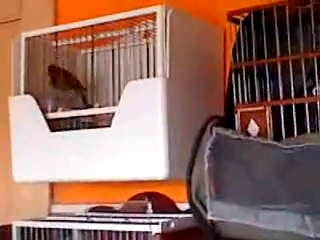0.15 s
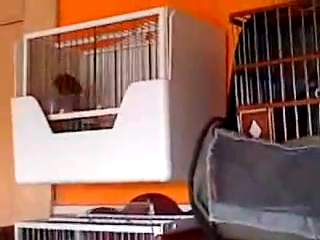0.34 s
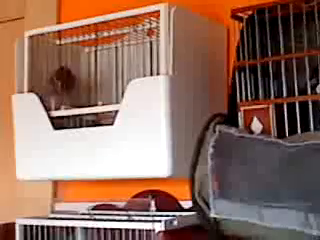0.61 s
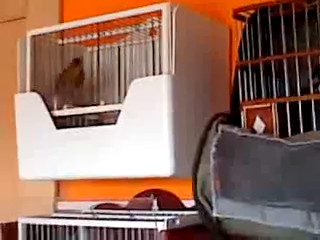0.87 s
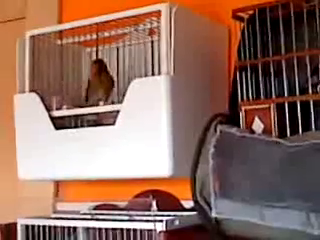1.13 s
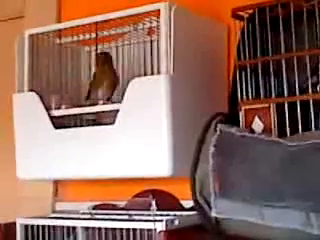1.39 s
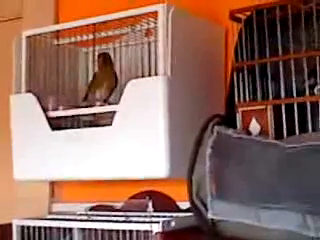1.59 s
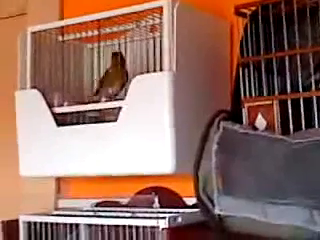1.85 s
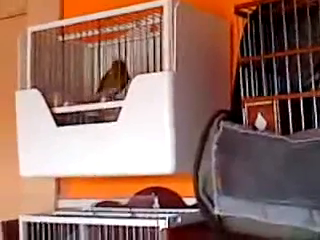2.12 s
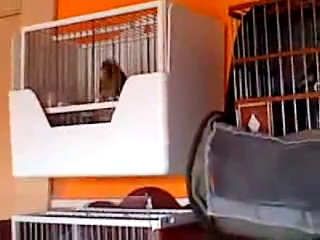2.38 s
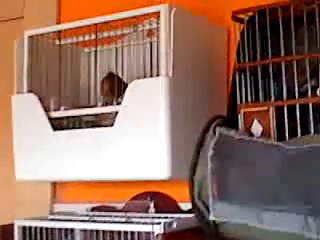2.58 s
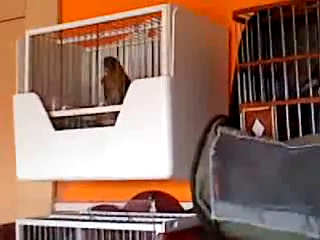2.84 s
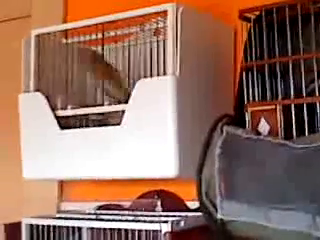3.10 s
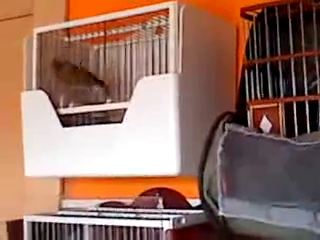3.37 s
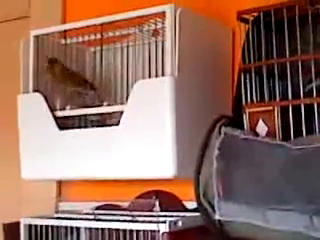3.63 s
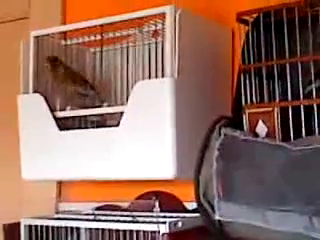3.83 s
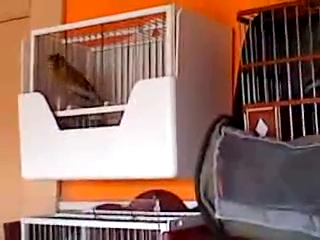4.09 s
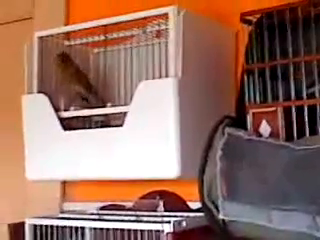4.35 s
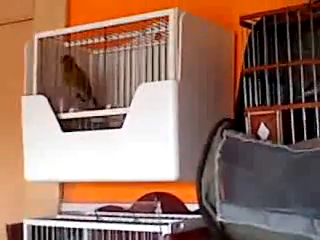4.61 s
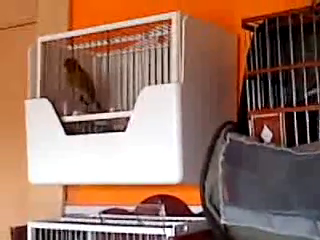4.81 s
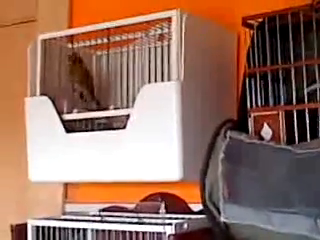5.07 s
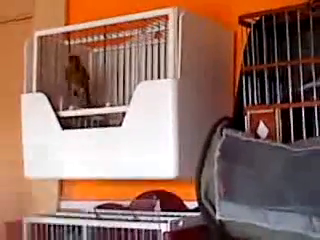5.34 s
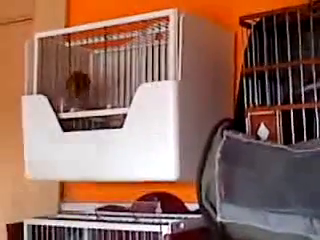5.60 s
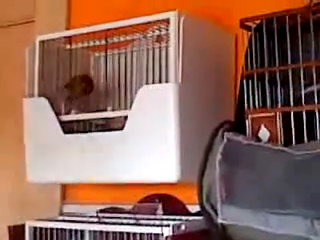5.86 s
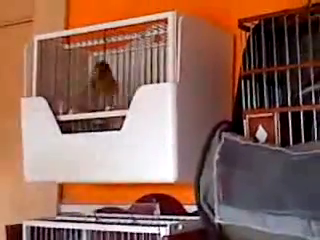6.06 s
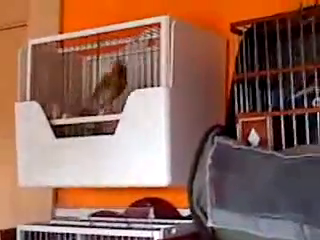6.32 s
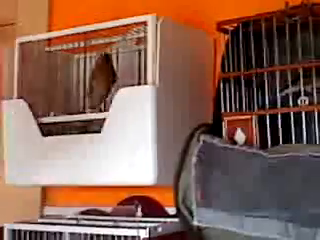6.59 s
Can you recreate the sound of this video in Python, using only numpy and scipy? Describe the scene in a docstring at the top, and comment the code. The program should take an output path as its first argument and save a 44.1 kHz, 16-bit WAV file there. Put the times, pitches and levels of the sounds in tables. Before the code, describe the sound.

Close, rapid finch song of whistled phrases rings in a hard-walled room, followed by fainter whistles and scratchy chirps from other birds and soft cage knocks.

```python
"""A small finch sings close by in its cage: fast trills of pure whistles, gliding sines that swell and fade,
and two buzzy falling slurs whose pitch and strength shake. Dense echoes of a hard-walled room smear it all.
Further off, other birds whistle and chirp harshly on two scattered voices; the cage knocks softly, ringing
in a few modes. Behind lie street noise shaped in bands, a far engine's wavering drone and a faint mains hum."""
import sys
import numpy as np
from scipy import signal
from scipy.io import wavfile
from scipy.ndimage import uniform_filter1d, map_coordinates

SR = 44100
rng = np.random.default_rng(int(sys.argv[2]) if len(sys.argv) > 2 else 0)


def gain_from_decibels(decibels):
    """Convert decibel values to linear amplitude factors."""
    exponent = np.asarray(decibels, float) / 20
    return 10 ** exponent


def wav_out(sig):
    """Save sig, one row per channel (or a flat mono array), as 16-bit PCM at SR to the path in sys.argv[1]."""
    wavfile.write(sys.argv[1], SR, np.round(np.clip(np.atleast_2d(sig).T, -1, 1) * 32767).astype(np.int16))


N = 295470  # samples, 6.7 s


def add(mix, s, sound):
    """Mixes a sound in at time s; the mix starts one second early."""
    part = mix[round((s + 1) * SR):][:len(sound)]
    part += sound[:len(part)]


def wander(length, hz):
    """Smooth random curve of rms near 1 that turns about hz times a second."""
    knots = rng.standard_normal(int(length * hz / SR) + 6)
    return map_coordinates(knots, [np.arange(length) * hz / SR + 1], order=3)


def tone(hz, db):
    """A sine on a pitch curve with soft ends; db is its rms level between them."""
    wave = np.sin(2 * np.pi * np.cumsum(hz) / SR)
    return np.sqrt(2) * gain_from_decibels(db) * wave * signal.windows.tukey(len(hz), .15)


def whistles(mix, strokes, repeats):
    """Strokes glide to a held note, swell and fade; fast slight wavers of pitch and level make them grainy."""
    ease = 1.44  # the glide slows as it lands
    fade_db_per_s = 303
    stray = 0.0031  # share by which the pitch of each stroke strays
    overtone_db = -40.5  # the faint second harmonic, under the whistle
    for start, effort_db in repeats:
        for delay, from_hz, to_hz, glide, hold, db, swell_db in strokes:
            t = np.arange(0, glide + hold, 1 / SR)
            left = np.clip(1 - t / glide, 0, 1)  # share of the glide still to come
            hz = to_hz + (from_hz - to_hz) * left ** ease
            hz = hz * (1 + stray * rng.standard_normal())
            hz = hz * (1 + .005 * wander(len(t), 280))
            fade_db = fade_db_per_s * np.maximum(t - glide, 0)
            level_db = effort_db + db - swell_db * left - fade_db
            level_db = level_db + 2.5 * wander(len(t), 130)
            add(mix, start + delay, tone(hz, level_db) + tone(2 * hz, level_db + overtone_db))


def slur(length, top_hz, bottom_hz, peak_db):
    """A falling whistle whose pitch and strength shake fast and unevenly, heard as a buzz."""
    buzz_hz, swing_hz = 157.2, 394  # mean rate of the shake, and how far the pitch swings each way
    peak_at, swell_db, fade_db = 0.73, 15, 12  # loudest at this share of the fall
    u = np.arange(0, length, 1 / SR) / length
    hz = top_hz * (bottom_hz / top_hz) ** u  # equal octaves in equal times
    db = peak_db - np.interp(u, [0, peak_at, 1], [swell_db, 0, fade_db])
    shake = 2 * np.pi * np.cumsum(buzz_hz * (1 + 0.27 * wander(len(u), 86))) / SR
    level_db = db + 6 * np.cos(shake + .3) + 2.5 * wander(len(u), 150)
    return tone(hz + swing_hz * np.sin(shake), level_db)


def finch():
    """The close singer, without the room: phrases of whistled strokes, and two slurs."""
    # song phrases by name; levels are ahead of the room and the mix
    # strokes: delay/s, from f/Hz, to f/Hz, glide/s, hold/s, level/dB, swell/dB (a flick has no hold)
    # repeats: t/s, effort/dB
    phrases = { "four steps": ([(.005, 3225, 3840, .018, 0.01, -17, 28),
               (.097, 2840, 3320, 0.025, 0.0052, -41, 1), (.129, 4010, 4416, 0.013, .02, -21, 0),
               (.181, 6050, 5610, 0.026, 0.0083, -32.5, 0.5), (.202, 5420, 5310, 0.056, .015, -30, -1)],
               [(-.36, 4), (-.088, 1), (.182, -0.5), (.453, 0)]),
               "two rises": ([(.002, 3070, 3946, .015, .013, -19, 12),
               (.052, 4100, 4640, .007, 0.0028, -25, -0.5), (.059, 4850, 5010, 0.0089, .024, -24.5, 5.5)],
               [(.748, -0.5), (.868, 1), (.988, 2), (1.108, 0.5), (1.229, 0), (1.352, 1), (1.477, 0)]),
               "slow hook": ([(.002, 3000, 3460, 0.026, 0.0091, -35.5, -2),
               (.046, 3800, 4780, .02, .008, -25.5, 6)], [(1.596, 2)]),
               "hook and hold": ([(.002, 3730, 3216, 0.016, 0.0066, -39.5, -14.5),
               (.016, 3300, 4257, 0.016, 0, -26.5, 8.5), (.029, 4280, 4422, .016, .004, -24.5, 2),
               (.044, 6300, 7300, .011, 0, -42.5, -10.5), (.056, 5740, 5638, 0.005, 0.021, -22.5, 9)],
               [(1.701, -0.5), (1.797, 1), (1.892, 1), (1.987, 0), (2.085, 1), (2.183, 0), (2.281, -1)]),
               "chup and cry": ([(-.016, 2450, 2700, 0.013, 0, -43.5, 5.5),
               (.002, 2950, 3363, 0.011, .012, -20, 11.5), (.034, 4485, 5554, .01, 0.0036, -28, 6),
               (.047, 5570, 5050, .008, 0.0016, -30, 0), (.047, 3700, 4250, .011, 0.007, -31, 3),
               (.059, 4300, 4530, 0.01392, .016, -15.5, 7)], [(2.724, -2), (2.856, 0), (2.987, 0),
               (3.119, -0.5), (3.251, -3)]), "rise and arch": ([(.003, 2400, 3065, .013, 0.00065, -41.5, 5),
               (.015, 3050, 3466, 0.0179, .006, -22.5, 3.5), (.061, 7240, 8710, .01, 0, -46, 4.5),
               (.071, 8950, 6350, 0.022, 0.0032, -36, 9.5), (.099, 6260, 6002, .018, .008, -27.5, 5)],
               [(3.638, -2.5), (3.784, -1), (3.928, -1.5), (4.069, -0.5), (4.215, 0), (4.357, 1),
               (4.508, -0.5)]), "closing pair": ([(.002, 3010, 3388, .018, 0.008, -25, 9),
               (.032, 5780, 5100, 0.0102, 0.0075, -32.5, 3), (.043, 5066, 4890, .028, 0.0023, -26.5, -1)],
               [(4.66, 0), (4.752, 1), (4.846, 1)]), }
    # buzzy falling slurs: t/s, length/s, top f/Hz, bottom f/Hz, level/dB ahead of shake, room and mix
    slurs = [(2.416, 0.25, 8460, 3404, -30), (3.41, .22, 8500, 3540, -28.5)]
    song = np.zeros(N + SR)
    for strokes, repeats in phrases.values():
        whistles(song, strokes, repeats)
    for s, *shape in slurs:
        add(song, s, slur(*shape))
    return song


def chirp(db, upper_hz):
    """Two voices droop while their pitch scatters too fast to be heard as a tone."""
    droop = np.linspace(1.07, .93, round(0.0369 * SR))
    fade_db = np.linspace(4, -12, len(droop))
    out = np.zeros(len(droop))
    for voice_hz in (upper_hz, .7 * upper_hz):
        pitch = voice_hz * droop * (1 + .11 * wander(len(droop), 700))
        out += tone(pitch, db + fade_db + 3 * wander(len(droop), 94))
    return out


def far_birds():
    """Birds further off, without the room: low whistles, a thin note among them, and harsh chirps."""
    # four low whistles, and among them one thin note on two pitches at once; levels ahead of room and mix
    # strokes: delay/s, from f/Hz, to f/Hz, glide/s, hold/s, level/dB, swell/dB; repeats: t/s, effort/dB
    far_whistle = ([(.004, 2002, 2398, 0.0197, 0.0056, -47.5, 2.2)], [(5.437, -3), (5.706, 0.5),
                    (5.916, -4.5), (6.378, -1)])
    thin_note = ([(0, 5930, 5630, 0.017, 0.018, -51.5, 5.5), (0, 7000, 6850, 0.0059, .008, -53, 6)],
                  [(5.64, 0)])
    # harsh two-voiced chirps: t/s, level/dB ahead of fade, room and mix, upper voice f/Hz
    chirps = [(4.433, -51, 5400), (4.529, -50, 5280), (4.631, -51, 5350), (4.725, -51, 5900),
              (4.973, -52.5, 5730), (5.058, -52.5, 5810), (5.168, -54.5, 5660), (5.283, -58.5, 5730),
              (5.415, -67, 5200), (6.03, -56, 5140), (6.134, -50, 5140), (6.21, -56.5, 4450),
              (6.245, -54, 5030), (6.377, -53, 5050), (6.488, -53.5, 5280), (6.597, -52.5, 5270)]
    calls = np.zeros(N + SR)
    whistles(calls, *far_whistle)
    whistles(calls, *thin_note)
    for s, *voice in chirps:
        add(calls, s, chirp(*voice))
    return calls


def knocks():
    """Each knock rings the modes of the cage, with a dull puff of noise."""
    # soft knocks on the cage: t/s, peak level of the ring/dB
    knock_times = [(6.216, -28.5), (6.229, -26), (6.25, -28.5)]
    # modes of the cage: f/Hz, relative level/dB, time to fall 60 dB/s
    cage = [(206, -19, 0.074), (335, 4.5, 0.23), (670, -2, 0.094), (955, 7, 0.054), (1393, -1, 0.097),
            (1840, -10, 0.035)]
    t, out = np.arange(SR // 4) / SR, np.zeros(N + SR)
    ring = sum(gain_from_decibels(db - 60 * t / t60) * np.sin(2 * np.pi * hz * t) for hz, db, t60 in cage)
    for s, db in knock_times:
        puff = gain_from_decibels(-14.5 - 60 * t / 0.21) * wander(len(t), 4000)
        add(out, s, gain_from_decibels(db) * (ring / abs(ring).max() + puff))
    return out


def room(x, direct_db, count=3):
    """Dense echoes: several random tails that blend into one another steadily, added to the direct sound."""
    hz, t, z = signal.stft(rng.standard_normal((count, SR // 2)), SR, nperseg=128)
    # air and cloth take the treble first
    t60 = 0.34 / (1 + (hz[:, None] / 14000) ** 2)
    # nearly even for about 68 ms, then a quick drop to a weaker tail
    late = 1 / (1 + np.exp(-(t - .068) / .005))
    fade_db = -60 * t / t60 - 7 * late
    tails = signal.istft(z * gain_from_decibels(fade_db), SR, nperseg=128)[1]
    # no echo in the first 2 ms
    tails = tails * np.clip((np.arange(tails.shape[1]) / SR - .002) / 0.00087, 0, 1)
    phase = np.arange(len(x)) / SR * 2.5  # in half cycles
    out = gain_from_decibels(direct_db) * x
    for k, tail in enumerate(tails):
        weight = np.sqrt(2 / count) * np.cos(np.pi * (phase + k / count))  # squares sum to 1
        out = out + signal.oaconvolve(x * weight, tail / np.linalg.norm(tail))[:len(x)]
    return out


def read(points, hz):
    """Spectrum points joined on a log-frequency axis."""
    f, value = np.transpose(points)
    return np.interp(np.log(hz + 1), np.log(f + 1), value)


def evened(x):
    """Scales to rms 1."""
    return x / np.sqrt(np.mean(x ** 2) + 1e-20)


def street():
    """Street noise: random short-time spectra with faint drifting patches, at -42 dB rms."""
    # spectrum of the street at the microphone: f/Hz, relative density/dB per Hz
    street_spectrum = [(12, -43), (20, -7.5), (68, 2), (190, -4.5), (320, -3.5), (600, -5), (721, -1),
                       (780, -5.5), (866, -3), (1150, -4), (1900, -16.5), (2400, -16), (3200, -18.5),
                       (8890, -22.5), (10400, -25), (13500, -81), (22000, -120)]
    frames, hz = N // 256 + 5, np.fft.rfftfreq(1024, 1 / SR)
    a, b, patches = rng.standard_normal((frames, 513, 3)).T
    patches = uniform_filter1d(patches, 10, 0)  # along frequency
    patches = evened(uniform_filter1d(patches, 16, 1))  # along time
    z = (a + 1j * b) * gain_from_decibels(read(street_spectrum, hz)[:, None] + 1.19 * patches)
    noise = signal.istft(z, nperseg=1024, noverlap=768)[1][:N]
    return gain_from_decibels(-42) * evened(noise)


def drone():
    """A far engine: one low sine that wavers slightly in pitch and level."""
    # course of the drone: t/s, f/Hz, level/dB ahead of the waver
    drone_course = [(0.161, 69.26, -58), (0.241, 68.1, -42), (1.0, 69, -46), (1.68, 68.9, -52.5),
                    (1.78, 68.8, -47), (2.001, 65.06, -45.5), (2.399, 63.83, -48.5), (2.851, 64.5, -61.5),
                    (3.3, 58.4, -54), (3.9, 60, -50.5), (4.5, 60.7, -61), (5.2, 58, -60), (6.3, 58, -50),
                    (6.7, 57.3, -58)]
    s, hz, db = np.transpose(drone_course)
    t = np.arange(N) / SR
    level = gain_from_decibels(np.interp(t, s, db) + 0.49 * wander(N, 1.7))
    pitch = np.interp(t, s, hz) + 0.43 * wander(N, 1.4)
    return np.sqrt(2) * level * np.sin(2 * np.pi * np.cumsum(pitch) / SR)


def hum():
    """Mains hum of an appliance: faint lines of steady pitch whose levels flutter."""
    # hum lines: f/Hz, level/dB ahead of the flutter
    hum_lines = [(99.5, -60.5), (199, -63)]
    t, out = np.arange(N) / SR, np.zeros(N)
    for hz, db in hum_lines:
        out += np.sqrt(2) * gain_from_decibels(db + 3.8 * wander(N, 15)) * np.sin(2 * np.pi * hz * t)
    return out


def grain_and_dropouts(x, grain_db, mute_db, size=10):
    """Each band gains noise under its level; treble bands weak beside the loudness around them drop out."""
    hz, _, z = signal.stft(x, SR, "cosine", nperseg=800, noverlap=400)
    z = z[:-1].reshape(-1, size, z.shape[1])  # band, bin in band, frame
    power = (abs(z) ** 2).mean(1, keepdims=True)
    loudness = uniform_filter1d(power.sum(0), size=12, axis=1)  # all bands, over a tenth of a second
    a, b = rng.standard_normal((*z.shape[::-1], 2)).T
    luck_db = 6.5 * uniform_filter1d(a[:, :1], size=2, axis=2)
    muted = 10 * np.log10(power / loudness + 1e-12) + luck_db < mute_db
    treble = hz[:-1].reshape(-1, size, 1) > 2400
    grain = gain_from_decibels(grain_db) * np.sqrt(power / 2) * (a + 1j * b)
    z = (z + grain) * ~(muted & treble)
    z = np.pad(z.reshape(-1, z.shape[2]), ((0, 1), (0, 0)))
    return signal.istft(z, SR, "cosine", nperseg=800, noverlap=400)[1][:N]


def scene():
    """The finch close by, the other birds with their own echoes, the cage knocks dry, the background beneath."""
    near, far = room(finch(), -3), room(far_birds(), -2)
    birds = gain_from_decibels(2.0) * near + gain_from_decibels(6.5) * far + knocks()
    return (birds[SR:] + street() + drone() + hum())[None]


def low_pass(x):
    """Removes everything above the highest recorded frequency."""
    return signal.sosfilt(signal.butter(12, 10990, fs=SR, output="sos"), x)


def record(dry):
    """Grain and treble dropouts, then a steep band limit at 9940 Hz."""
    grainy = grain_and_dropouts(dry[0], grain_db=-13, mute_db=-43.5)
    edge = signal.firwin(301, 9940, window=("kaiser", 8), fs=SR)
    mix = signal.oaconvolve(grainy, edge, "same")[None]
    return low_pass(mix)


dry = scene()
out = record(dry)
wav_out(out)
```